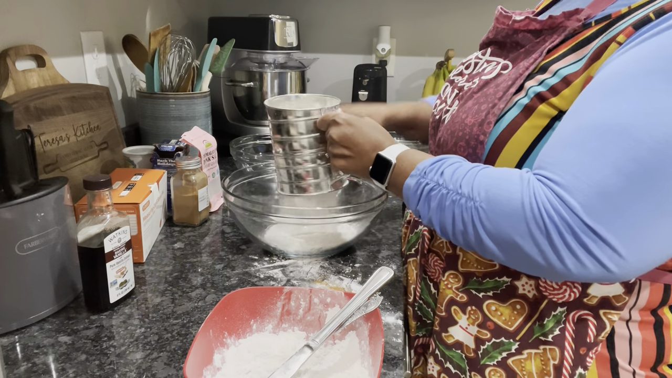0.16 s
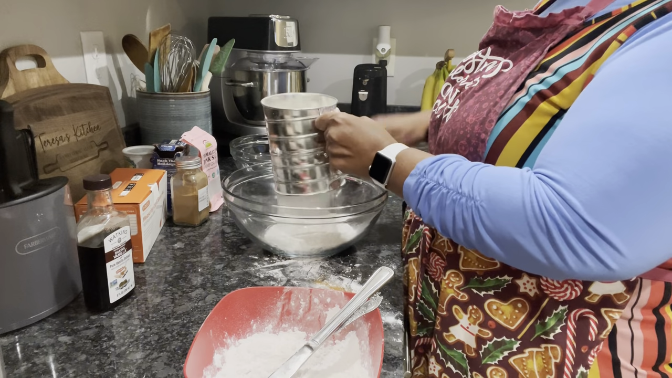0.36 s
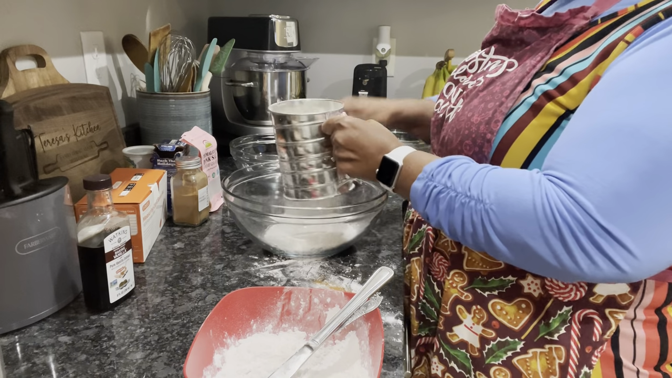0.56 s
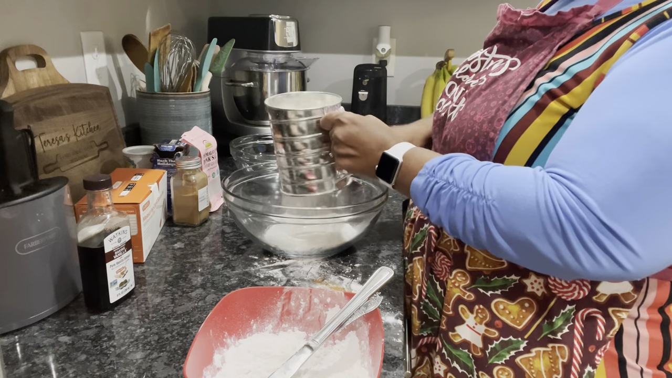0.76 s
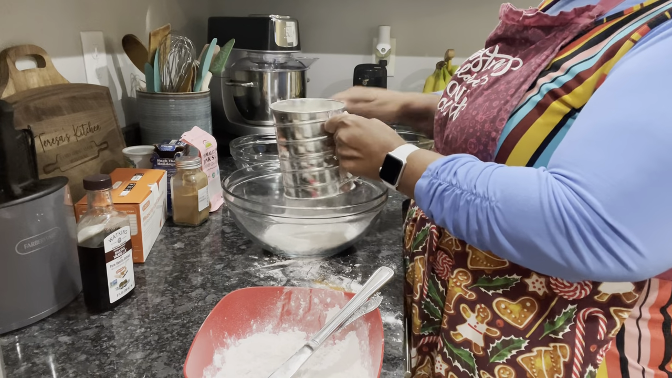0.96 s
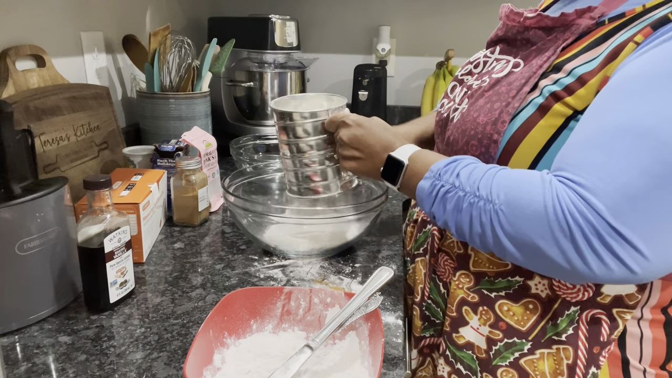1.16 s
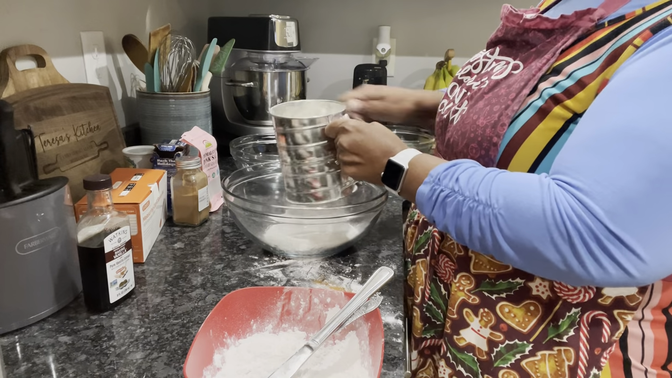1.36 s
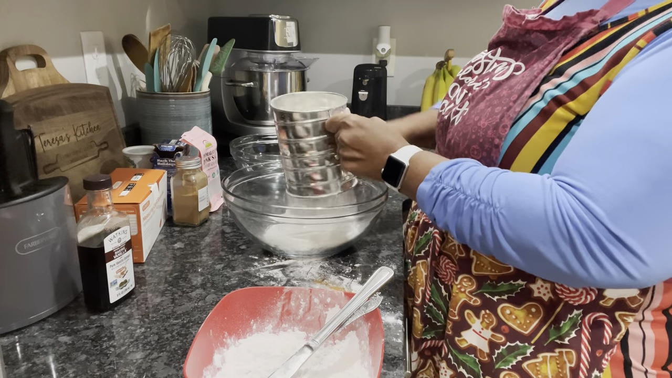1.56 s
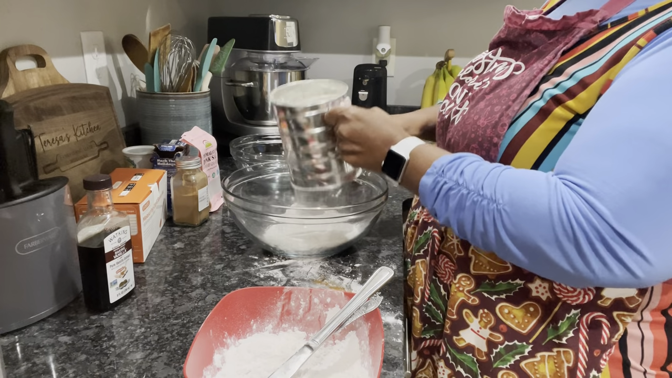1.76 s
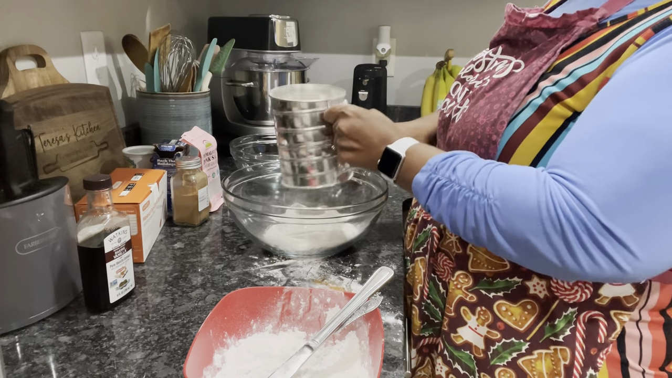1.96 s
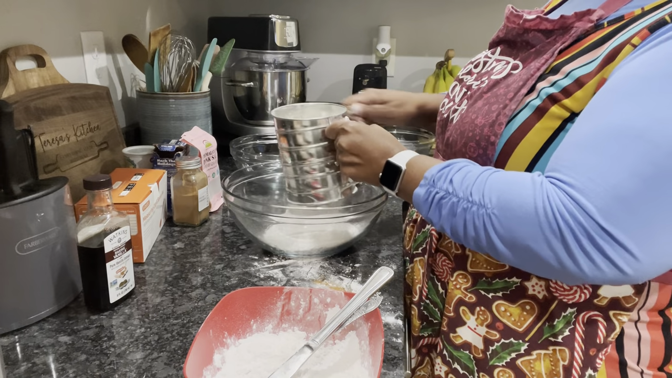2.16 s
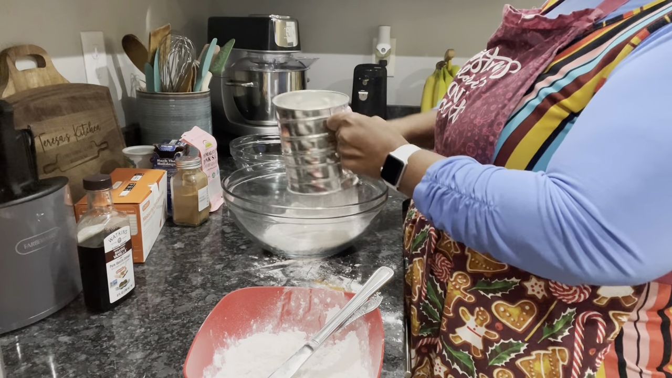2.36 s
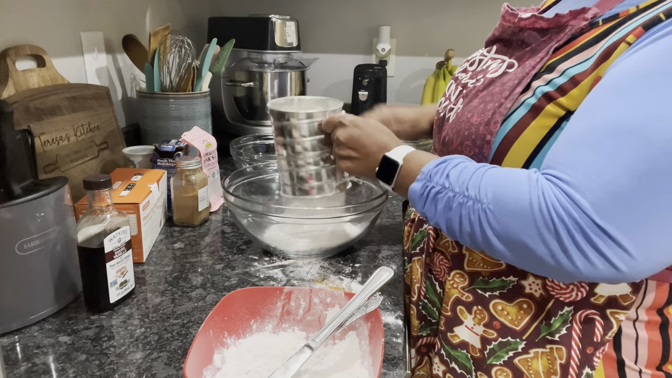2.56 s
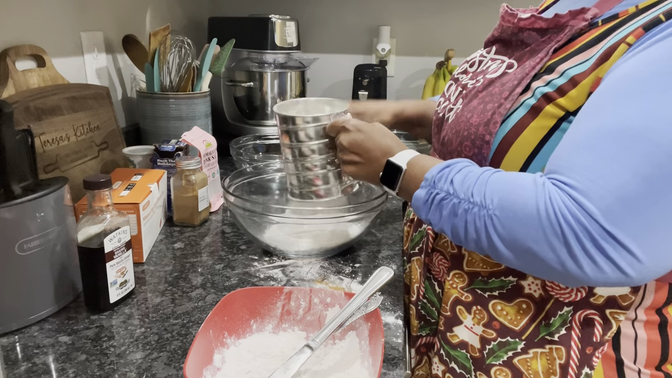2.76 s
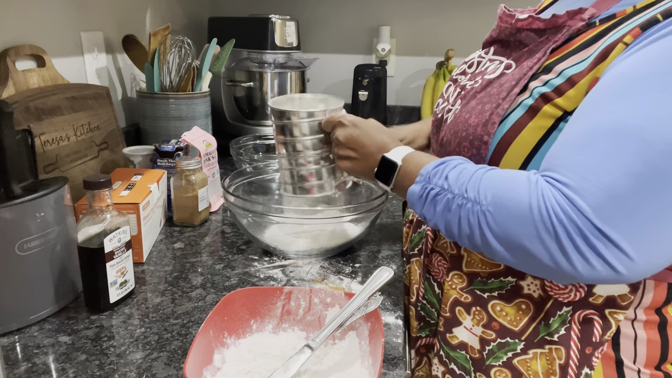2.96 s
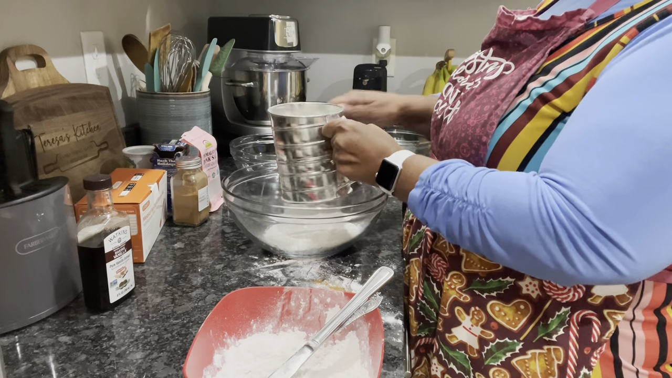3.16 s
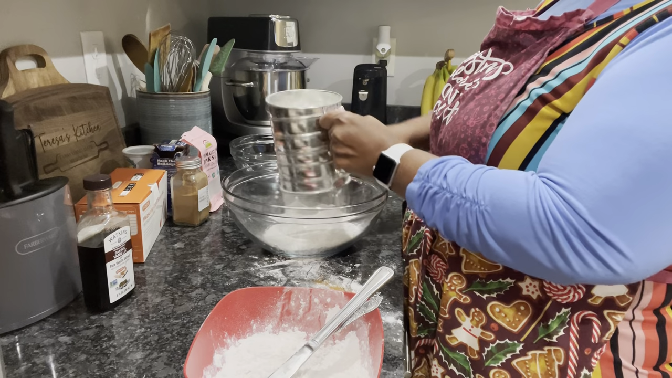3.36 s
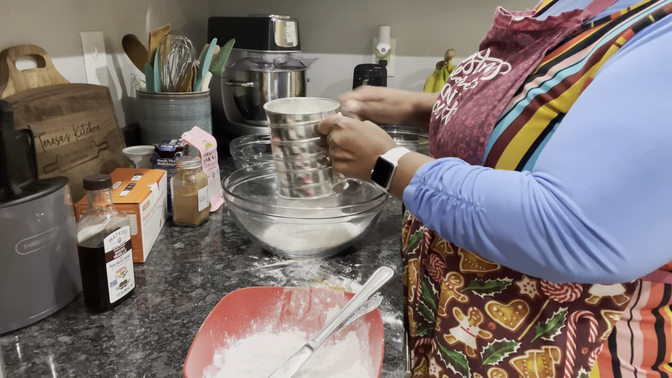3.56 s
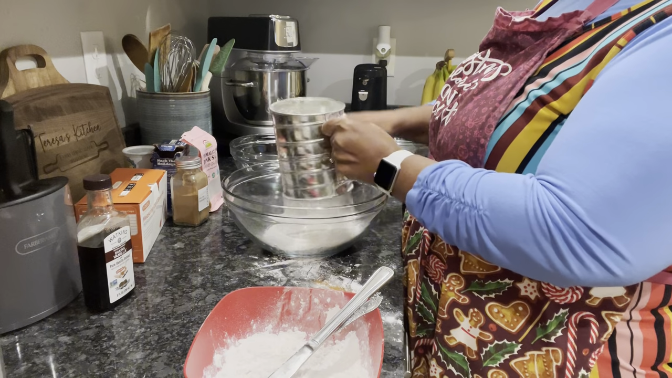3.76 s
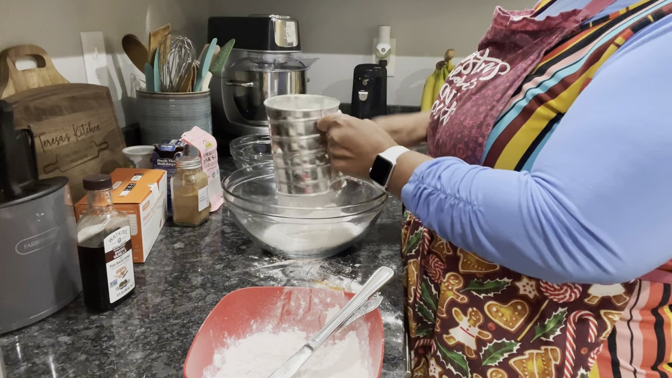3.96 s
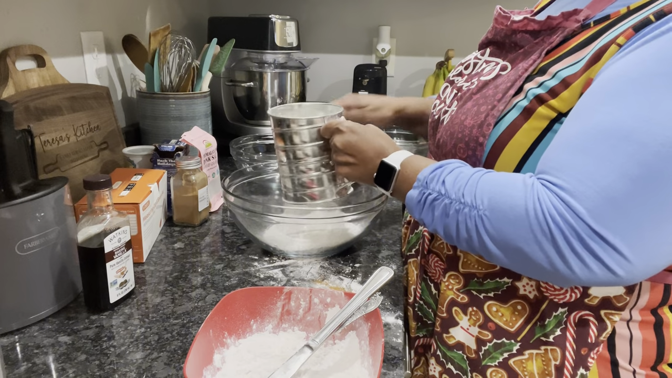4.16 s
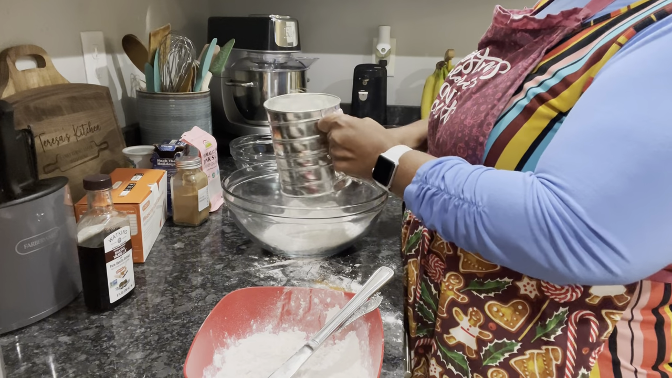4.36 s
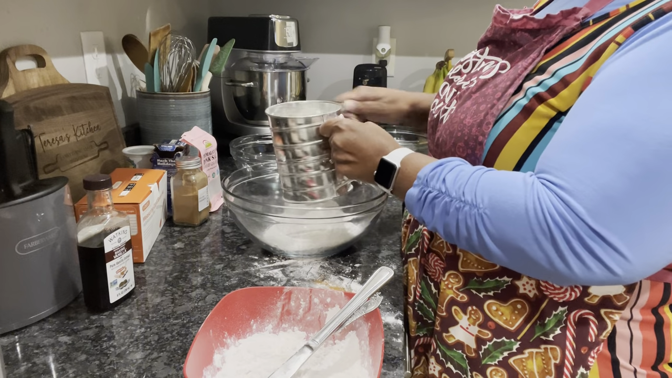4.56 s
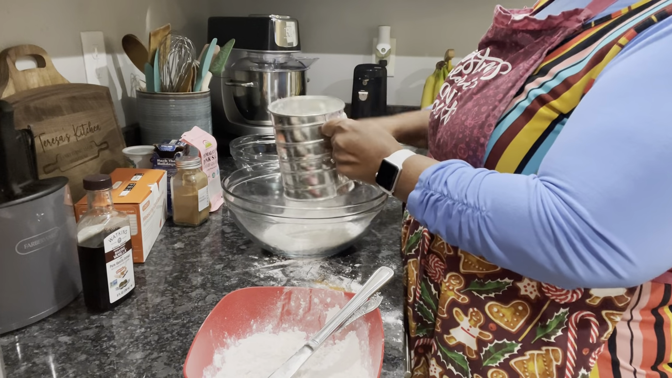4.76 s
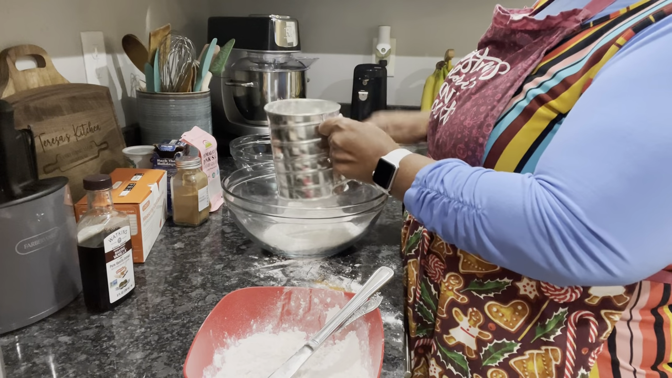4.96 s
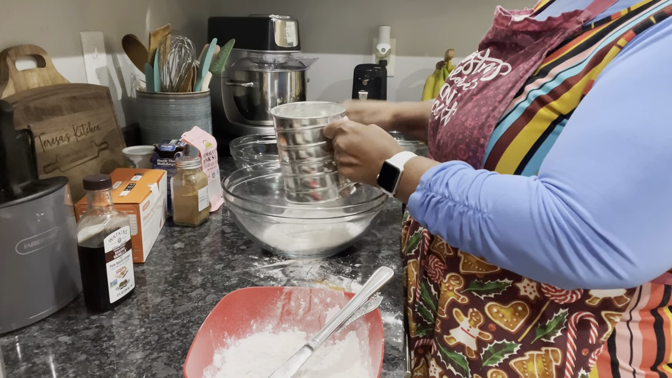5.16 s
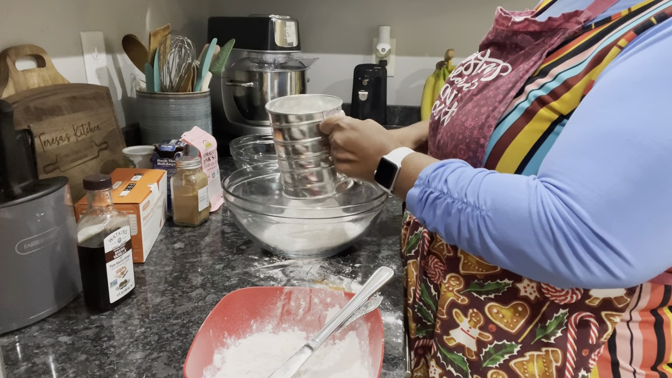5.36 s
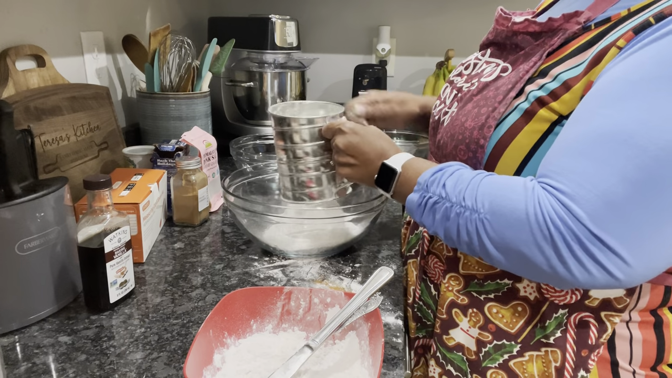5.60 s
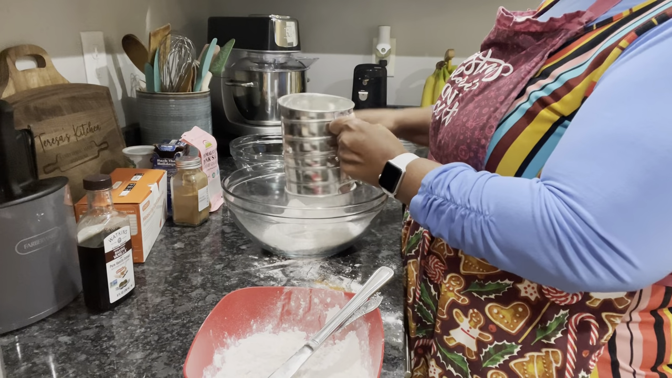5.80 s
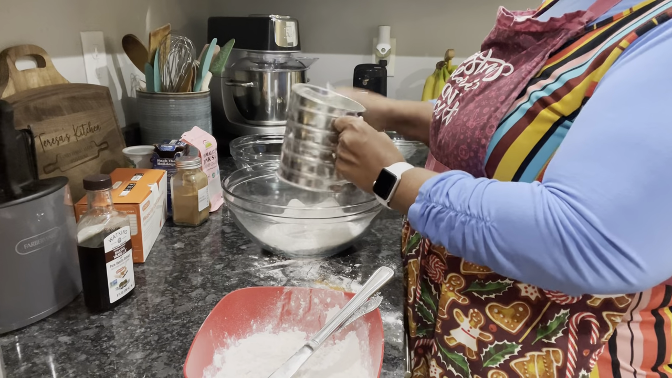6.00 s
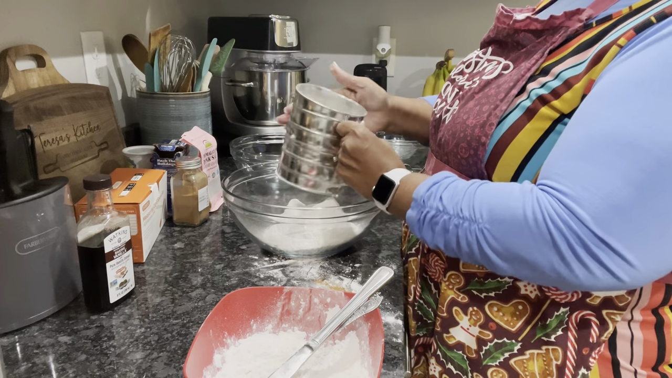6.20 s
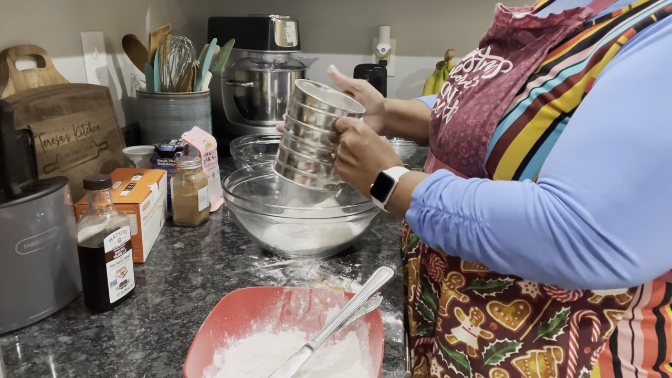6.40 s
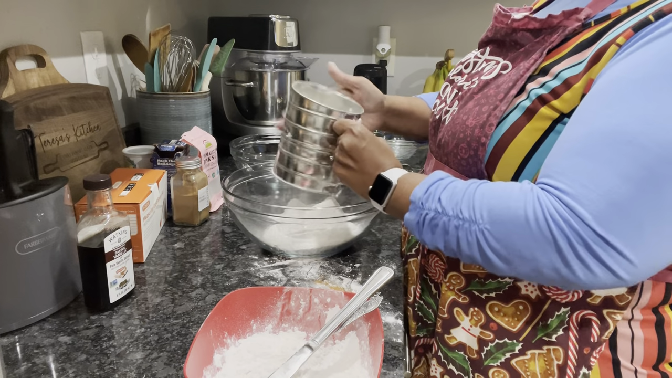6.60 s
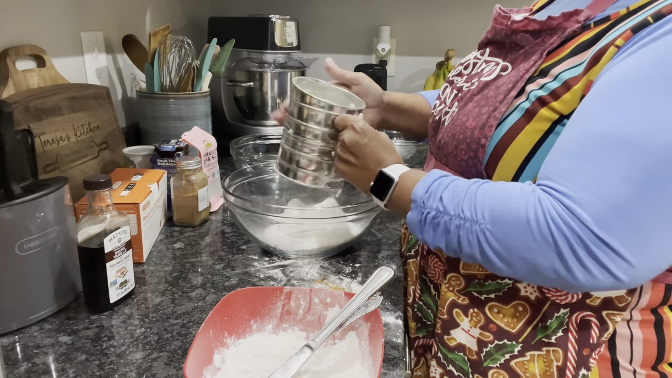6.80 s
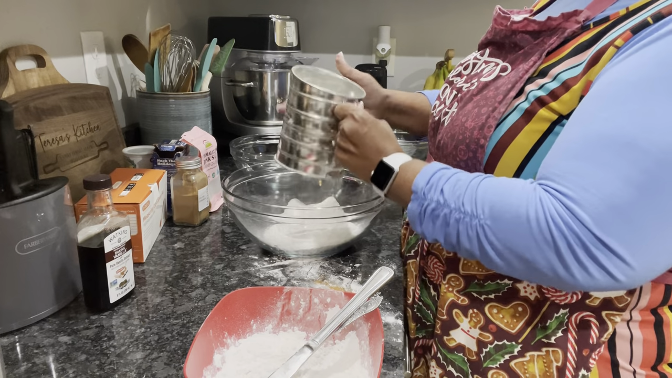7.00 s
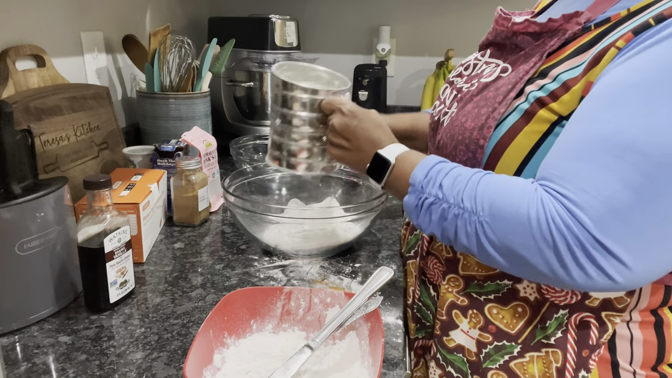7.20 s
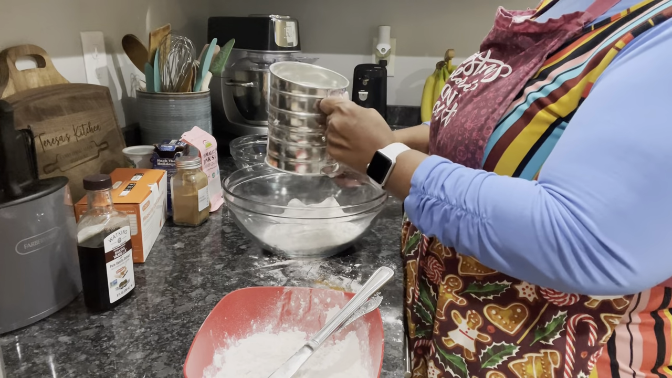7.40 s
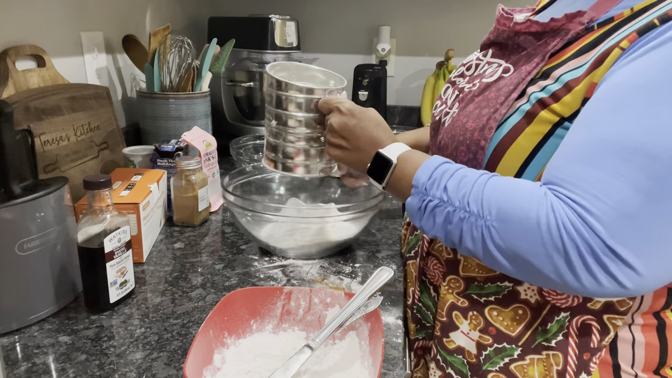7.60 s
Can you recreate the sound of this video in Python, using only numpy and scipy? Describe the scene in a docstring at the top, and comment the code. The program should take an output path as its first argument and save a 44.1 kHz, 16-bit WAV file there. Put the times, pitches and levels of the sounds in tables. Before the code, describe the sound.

A close stereo pair hears wire dragging over mesh in a flour sifter, fast and regular, with low groaning crunches of packed flour and irregular thin metallic ticks. After nearly six seconds of strokes, a palm hits the can in five evenly spaced thuds with tinny jangles. Two soft woody bumps end it, the second harder. The small kitchen adds brief echoes over a quiet bassy hush.

```python
"""A tin flour sifter is worked over a glass bowl in a small kitchen, about four strokes a second, close to a stereo pair.
Coloured grit noise makes the churning flour and the wire dragging over the mesh; flour stuck under the wire groans.
Loose metal clacks in noise bursts; resonances ring as the can, and short wandering delays stand for bowl and can wall.
Then the sifter is tipped and slapped five times with the palm; two dull knocks follow, built from damped modes.
The kitchen's echoes lie under the direct sound, over a faint, mostly low room hush."""
import sys
import numpy as np
from scipy import signal
from scipy.fft import rfft, irfft, next_fast_len
from scipy.io import wavfile

SR = 44100
rng = np.random.default_rng(int(sys.argv[2]) if len(sys.argv) > 2 else 0)


def int16_out(signal):
    """Quantize to a 16-bit WAV file."""
    q = np.round(np.clip(np.atleast_2d(signal).T, -1, 1) * 32767)
    wavfile.write(sys.argv[1], SR, q.astype(np.int16))


N = 336924
SIZE = next_fast_len(N + SR // 2, real=True)  # room for the echo tail
TIME, HZ = np.arange(N) / SR, np.fft.rfftfreq(SIZE, 1 / SR)

# Strokes of the wire. Each row: start in seconds, length in seconds, relative flour level in dB,
# relative level of wire on mesh in dB, pitch of the groan at mid-swell in Hz, its glide in octaves a second.
STROKES = [(0.008, .12, -35, -38, 400, -11), (0.243, 0.092, -38.5, -35.5, 380, -12),
           (0.441, 0.12, -34, -38, 344, 0), (0.686, 0.1, -37.5, -37, 378, -1),
           (0.884, .13, -38, -36, 427.2, 10), (1.126, 0.11, -38, -34.5, 399, 6),
           (1.340, 0.11, -35.5, -35.5, 472.5, 8), (1.553, 0.094, -40.5, -48.5, 370, -16),
           (1.953, 0.032, -36.5, -33, 400, -5.5), (2.129, .15, -36, -37.5, 540, 1),
           (2.38, .12, -37.5, -30.5, 200, -7), (2.604, .15, -36.5, -40, 331, 0),
           (2.861, 0.12, -42, -36, 338, -6.5), (3.072, 0.14, -36.5, -37, 334.4, -4.5),
           (3.342, 0.11, -41, -34.5, 329, -3.5), (3.54, 0.15, -37.5, -35.5, 322.5, 1),
           (3.821, .12, -42.5, -34, 338.7, -10), (4.037, 0.15, -38, -37, 332.5, -0.5),
           (4.297, .12, -41, -36, 307.2, -8), (4.527, 0.14, -38.5, -35.5, 309, 0.5),
           (4.793, .13, -40.5, -36, 308.2, 2), (5.024, 0.13, -37, -35.5, 330, 0),
           (5.293, .16, -40, -39, 301.2, 6.5), (5.577, 0.17, -40, -34.5, 333.4, -0.5)]
# Spectrum of the churned flour. Each row: frequency in Hz, relative level in dB per Hz.
FLOUR_SPECTRUM = [(40, -30.5), (90, -19.5), (150, -13), (210, 6.5), (270, -4), (335, 3), (410, -3.5),
                  (580, 2.5), (800, -2.5), (960, -8.5), (1200, -15), (2500, -20.5)]
# Spectrum of wire on mesh, before the can rings. Each row: frequency in Hz, relative level in dB per Hz.
MESH_SPECTRUM = [(200, -23), (800, 12.5), (1200, -3), (1600, 8), (2050, 8.5), (2500, 0.5), (3600, -0.5),
                 (4800, 3), (6500, 1), (7800, -11.5), (10000, 3.5), (12800, -3.5), (14500, -14),
                 (16000, -38)]
# Clacks of the mechanism. Each row: time in seconds, relative level in dB,
# weight of the can's body against the treble in dB.
CLACKS = [(0.059, -31, -10.5), (0.091, -31.5, -3.5), (0.275, -26, -11), (0.385, -43, 3.5),
          (0.458, -29, -12.5), (0.523, -33, -5.5), (0.718, -20, -12.5), (0.770, -27.5, -22),
          (0.832, -33, -8), (0.964, -22.5, -6), (1.124, -37, -13), (1.166, -24, -14), (1.241, -25.5, -7),
          (1.39, -30, -8), (1.418, -31, -11), (1.562, -20, -16.5), (1.944, -29.5, -8), (1.97, -28, -16.5),
          (2.417, -25.5, -8), (2.429, -22, -18), (2.459, -20.5, -12), (2.479, -19, -10),
          (2.613, -29.5, -8.5), (2.704, -21, -9.5), (2.955, -21, -13.5), (3.063, -43, 0.5),
          (3.168, -28.5, -6), (3.353, -29, -15.5), (3.44, -27, -5.5), (3.627, -26, -8.5),
          (3.671, -18, -9.5), (3.771, -33, -15), (3.83, -26, -14), (3.873, -23.5, -14.5), (3.996, -33, -9),
          (4.143, -24, -10.5), (4.309, -13.5, -17.5), (4.52, -27.5, -16.5), (4.622, -29.5, -7.5),
          (4.8, -25, -17), (4.828, -28, -6.5), (4.851, -26, -15), (4.894, -26.5, -8), (5.023, -26, -17),
          (5.11, -26, -13), (5.298, -24.5, -20), (5.386, -20, -11.5), (5.425, -19.5, -11),
          (5.439, -28.5, -16), (5.545, -34.5, -9), (5.694, -25.5, -11.5), (5.867, -35, -18),
          (5.924, -33, -8), (6.184, -27.5, -14), (6.196, -22.5, -10), (6.224, -25.5, -15.5),
          (6.373, -22, -10), (6.385, -20, -16.5), (6.421, -21.5, -15.5), (6.507, -34.5, -4.5),
          (6.558, -18, -10.5), (6.595, -26.5, -22), (6.736, -15, -11), (6.883, -31.5, -12.5),
          (6.920, -15.5, -9), (6.936, -25.5, -14.5), (6.985, -27, -15), (7.194, -27.5, -9)]
# Spectrum of a clack's treble. Each row: frequency in Hz, relative level in dB per Hz.
CLACK_TOP_SPECTRUM = [(1200, -18.5), (2700, -0.5), (3600, 1.5), (4700, 6), (6500, 3.5), (7800, -8.5),
                      (10000, 3.5), (12700, -3), (14500, -14.5), (16000, -27.5)]
# Spectrum of a clack's body. Each row: frequency in Hz, relative level in dB per Hz.
CLACK_BODY_SPECTRUM = [(60, -16.5), (200, -5), (600, 0.5), (1150, -4), (1600, 4.5), (2100, 8), (2700, -4),
                       (4000, -37)]
# Bright edge of a hard clack. Each row: frequency in Hz, relative level in dB per Hz.
SIZZLE_SPECTRUM = [(3000, -40), (7000, -8), (10000, 2.5), (12500, 3.5), (14500, -2.5), (16000, -18.5)]
# Modes of the can. Each row: frequency in Hz, width in Hz, gain in dB when upright, gain in dB when tipped,
# both gains before the grip shifts them.
CAN_MODES = [(1447, 48, 2.5, -5), (1640, 123, 4.5, -18), (1885, 60, 4, 1), (2180, 16, -12, 6),
             (2854, 31, 10, -6), (2983, 90, 7.5, 0), (3255, 21, -10, 11.5), (3830, 91, -7.5, 4),
             (4295, 40, 5, 9.5), (4760, 32, 5.5, 3), (4920, 31, -6.5, 8.5), (6500, 650, 3, 4),
             (8060, 35, -20.5, 9.5), (10290, 5.3, -17.5, 7.5), (12100, 240, -6.5, -7),
             (12900, 150, 2.5, -5)]
# The hand slaps or jolts the can. Each row: time in seconds, relative level in dB, factor on the thud's pitch,
# relative level of the wire shaken against the mesh in dB.
SLAPS = [(1.945, -34, 1.1, -48), (6.185, -27, 0.95, -31.5), (6.375, -26.5, 0.98, -39.5),
         (6.557, -23, 1.11, -27), (6.740, -26, 0.96, -30.5), (6.922, -23.5, 0.83, -37)]
# Modes that a slap pushes. Each row: frequency in Hz before the pitch factor, relative level in dB,
# t60 in seconds, delay in seconds.
THUD_MODES = [(565, 5.5, 0.011, 0.00042), (376, 5.5, 0.013, 0.0012), (254, -1, 0.034, 0.0033),
              (111, -4.5, 0.049, 0.0066)]
# Dull knocks nearby. Each row: time in seconds, relative level in dB,
# frequency in Hz above which the soft contact passes little.
KNOCKS = [(7.350, -27, 950), (7.360, -27, 900), (7.509, -24.5, 1190), (7.520, -22.5, 1500),
          (7.534, -29.5, 1800), (7.552, -43, 1500)]
# Modes that the knocks ring with. Each row: frequency in Hz before a small random shift, relative level in dB,
# t60 in seconds, delay in seconds.
WOOD_MODES = [(74, -22, 0.36, 0.012), (121, -14, 0.214, 0.0084), (200, -7, 0.034, 0.0048),
              (465, -8.5, 0.1, 0.00079), (560, -3.5, 0.021, 0.00023), (639, -2, 0.053, 0.00034),
              (715, -5.5, 0.04, 0.00028), (832, -9.5, 0.043, 0.0006), (1070, -16, 0.2, 0.00077),
              (1247, -28, 0.037, 0.00042), (1830, -26, 0.073, .0004), (2420, -23, .06, 0.00039)]
# Decay of the kitchen. Each row: frequency in Hz, t60 in seconds.
KITCHEN_DECAY = [(100, 0.47), (500, 0.31), (1500, 0.35), (4500, 0.46), (10000, 0.21), (15000, 0.14)]
# Spectrum of the room hush. Each row: frequency in Hz, relative level in dB per Hz.
HUSH_SPECTRUM = [(30, -8.5), (50, -8), (66, 5), (98, -7.5), (120, 3), (170, -5), (250, -8), (550, -13),
                 (1000, -20.5), (3000, -34.5), (13000, -39.5), (16000, -62.5)]
# Width of the microphone pair. Each row: frequency in Hz, gain of the side signal in dB.
WIDTH = [(60, -11.5), (200, -12), (400, -6), (800, -3), (1150, -0.5), (1900, -5), (3500, -2), (6500, -7.5),
         (8500, 1.5), (10400, -7), (12000, -26.5), (14000, -19.5)]
# Balance of the microphone pair. Each row: frequency in Hz, left minus right in dB.
LEAN = [(60, 2), (120, 5), (240, 5), (480, 3), (950, -0.5), (1890, 1.5), (3770, 1.5), (7520, 0.5),
        (15000, -0.5)]
# Phase between the microphones. Each row: frequency in Hz, lag of the left behind the right in radians.
LAG = [(0, 0), (700, 0.5), (1050, -.3), (1900, -.2), (2400, .7), (4000, 1.2), (5300, 2.3), (7700, 2.3),
       (9600, 1.0), (10800, .15), (13000, 0)]

CRUNCH_AT = 0.59  # where the flour resists most, as a share of the stroke


def flour(crunch_width=0.26):
    """Packed flour gives way in soft crunches that swell and fade with each stroke."""
    t = np.arange(-SR // 4, SR // 4) / SR
    push = np.zeros(N)
    for start, length, flour_db, _, _, _ in STROKES:
        swell = 1 / np.cosh(t / (crunch_width * length))
        add(push, start + CRUNCH_AT * length + t[0], amp(flour_db) * swell)
    crunches = grit(per_s=600, life_s=0.0022, spread_db=3.5) * push
    return colour(crunches, FLOUR_SPECTRUM) * amp(-3.5)


def groans(stroke_share=0.19, width_hz=45, share_db=-4.0):
    """Flour sticks and slips under the wire in mid-stroke: a short, hoarse, gliding note."""
    t = np.arange(-SR // 10, SR // 10) / SR
    smoothing = np.exp(-np.pi * width_hz / SR)
    out = np.zeros((2, N))
    for start, length, flour_db, _, hz, glide in STROKES:
        swell = np.exp(-0.5 * (t / (stroke_share * length)) ** 2)
        noise = rng.standard_normal((2, len(t), 2)) @ [1, 1j]
        waver = signal.lfilter([1], [1, -smoothing], noise)  # slow noise makes the note hoarse
        phase = 2 * np.pi * np.cumsum(hz * 2 ** (glide * t)) / SR
        note = (waver * np.exp(1j * phase)).real * swell
        for channel, voice in zip(out, note):
            voice = voice * np.linalg.norm(swell) / np.linalg.norm(voice)
            add(channel, start + CRUNCH_AT * length + t[0], amp(flour_db + share_db) * voice)
    return out


def scrape():
    """The wire ticks over the threads of the mesh and now and then snags on one."""
    threads = grit(per_s=1400, life_s=0.0015, spread_db=0.5) * amp(-9.0)
    snags = grit(per_s=80, life_s=0.0018, spread_db=2.5) * amp(-11.0)
    return colour((threads + snags) * drag(), MESH_SPECTRUM)


def drag():
    """How hard the wire rubs the mesh: driven by each stroke, shaken by slaps, nudged by clacks."""
    bite_s, bite_db = 0.0027, -11  # it bites softly,
    pressed_at, run_out_s = 0.89, 0.014  # presses harder up to a share of the stroke, holds, runs out
    return_db, return_s = -12.5, 0.091  # and slides back lightly
    shake_s, nudge_db, nudge_s = 0.065, -23.5, 0.041
    t = np.arange(SR // 2) / SR
    bite = 1 - np.exp(-t / bite_s)
    power = np.zeros(N)
    for start, length, _, wire_db, _, _ in STROKES:
        press = amp(bite_db * np.maximum(1 - t / (pressed_at * length), 0))
        after = np.maximum(t - length, 0)
        release = np.exp(-after / run_out_s) + amp(return_db) * np.exp(-after / return_s)
        add(power, start, (amp(wire_db) * bite * press * release) ** 2)
    for s, _, _, shake_db in SLAPS:
        add(power, s, (amp(shake_db) * bite * np.exp(-t / shake_s)) ** 2)
    for s, db, _ in CLACKS:
        add(power, s, (amp(db + nudge_db) * bite * np.exp(-t / nudge_s)) ** 2)
    return np.sqrt(power)


def grit(per_s, life_s, spread_db):
    """Overlapping tiny slips of uneven size, as two unrelated signals (mid, side) of power 1."""
    size = amp(spread_db * np.minimum(rng.exponential(1, N), 4)) ** 2
    slips = size * (rng.random(N) < per_s / SR)
    power = signal.lfilter([1], [1, -np.exp(-1 / (life_s * SR))], slips)
    return np.sqrt(power / power.mean()) * rng.standard_normal((2, N))


def clacks(rise_s=0.00089, settle_s=0.0071, rattle_db=-20, rattle_s=0.015, hardness=0.69):
    """Loose metal chatters for a moment, then settles with a faint rattle; a faint soft swell lies around each clack."""
    chatter_s, swell_db, swell_s = 0.0092, -20, 0.005
    t = np.arange(-SR // 40, SR // 5) / SR
    age = np.maximum(t, 0)
    chatter = np.exp(-np.maximum(t - chatter_s, 0) / settle_s)
    rattle = amp(rattle_db) * np.exp(-age / rattle_s)
    swell = amp(swell_db) * np.exp(-abs(t) / swell_s)  # rises before and fades after the clack
    shape = (chatter + rattle) * (1 - np.exp(-age / rise_s)) + swell
    top, body, sizzle = np.zeros((3, N))
    for s, db, body_db in CLACKS:
        sizzle_db = db + hardness * (db - body_db)  # hard, light contacts are the brightest
        add(top, s + t[0], amp(db) * shape)
        add(body, s + t[0], amp(db + body_db) * shape)
        add(sizzle, s + t[0], amp(sizzle_db) * shape)
    contacts = grit(per_s=2400, life_s=0.0012, spread_db=3.0)
    fine_contacts = grit(per_s=2300, life_s=0.0006, spread_db=-1.0)
    bright = colour(fine_contacts * sizzle, SIZZLE_SPECTRUM) * amp(-10.5)
    treble = colour(contacts * top, CLACK_TOP_SPECTRUM) * amp(-12.5)
    return bright + treble + colour(contacts * body, CLACK_BODY_SPECTRUM) * amp(-5.5)


def can(x, grip_db=3, shifts_per_s=7, tipped_s=6.1):
    """The tin rings; the shifting grip favours now one mode, now another, and tipping frees others."""
    out = x.copy()
    for hz, width, upright_db, tipped_db in CAN_MODES:
        grips = amp(grip_db * rng.uniform(-2, 1, 100))
        grip = np.interp(TIME * shifts_per_s, np.arange(100), grips)
        gain = np.where(TIME > tipped_s, amp(tipped_db), amp(upright_db))
        out += signal.lfilter(*signal.iirpeak(hz, hz / width, fs=SR), x * grip * gain)
    return out


def bowl(x, echo=0.35, wander=0.12):
    """Bowl and can wall return close echoes whose paths change with the hand: a shifting metallic colour."""
    out = x.copy()
    for delay_s in (0.0009, 0.0021, 0.0037):
        drift = np.interp(TIME, np.linspace(0, TIME[-1], num=32), rng.standard_normal(32))
        late = np.arange(N) - np.round(delay_s * (1 + wander * drift) * SR).astype(int)
        out += echo * x[:, np.clip(late, 0, N - 1)]
    return out / np.sqrt(1 + 3 * echo ** 2)


def slaps():
    """The hand thuds against the side of the can, pushing a few short low modes."""
    out = np.zeros(N)
    for s, db, pitch, _ in SLAPS:
        add(out, s, amp(db) * blow(THUD_MODES, pitch, rise_s=0.00094))
    return out * amp([[3], [-16]])  # mid, side


def knocks(scuff_db=-12, scuff_s=0.0088):
    """Something wooden bumps twice, bounces and scuffs; the second bump is harder."""
    t = np.arange(SR // 2) / SR
    band = signal.butter(3, [350, 1100], "bandpass", fs=SR)
    out = np.zeros(N)
    for s, db, soft_hz in KNOCKS:
        scuff = signal.lfilter(*band, rng.standard_normal(len(t)))
        scuff *= amp(scuff_db) * np.exp(-t / scuff_s) / scuff.std()
        ring = blow(WOOD_MODES, rng.uniform(0.94, 1.03), rise_s=0.0013)
        soft_contact = signal.butter(2, soft_hz, fs=SR)
        add(out, s, amp(db) * signal.lfilter(*soft_contact, ring + scuff))
    return out


def blow(modes, pitch, rise_s):
    """Damped modes of one soft blow, each after its own delay; the lowest start late."""
    t = np.arange(SR // 2) / SR
    out = np.zeros(len(t))
    for hz, db, t60, delay in modes:
        age = np.maximum(t - delay, 0)
        envelope = (1 - np.exp(-age / rise_s)) * np.exp(-np.log(1000) * age / t60)
        out += amp(db) * envelope * np.sin(2 * np.pi * hz * pitch * age)
    return out


def kitchen(x, sway_per_s=0.9):
    """Three echo patterns trade places, as the sifter sways over the bowl."""
    turn = 2 * np.pi * sway_per_s * TIME
    echoes = sum(through(x * np.cos(turn + k * np.pi / 3), reflections()) for k in range(3))
    return echoes * np.sqrt(2 / 3)  # keeps the power steady through the sway


def reflections(gap_s=0.006):
    """Dense echoes from counter, wall and cupboards, each band dying at its own speed."""
    taps = rng.standard_normal((2, SR // 2))
    hz, t, bands = signal.stft(taps, SR, nperseg=256)
    decay = np.exp(-np.log(1000) * t / read(KITCHEN_DECAY, hz)[:, None])
    tail = signal.istft(bands * decay, SR, nperseg=256)[1]
    tail *= np.arange(tail.shape[1]) > gap_s * SR  # silent until the first echo
    return rfft(tail / np.linalg.norm(tail[0]), SIZE)


def room_hush():
    """Steady coloured noise behind everything, strongest in the bass."""
    return amp(-60.5) * colour(rng.standard_normal((2, N)), HUSH_SPECTRUM)


def amp(db):
    """Decibels to gain."""
    return 10 ** (np.asarray(db) / 20)


def read(points, hz):
    """A table read on a log-frequency axis."""
    f, value = np.transpose(points)
    return np.interp(np.log(hz + 1), np.log(f + 1), value)


def add(mix, s, sound):
    """Adds a sound that starts at time s, trimmed to the length of the mix."""
    start = round(s * SR)
    sound = sound[max(-start, 0):]
    part = mix[max(start, 0):][:len(sound)]
    part += sound[:len(part)]


def through(x, response):
    """Applies a frequency response."""
    return irfft(rfft(x, SIZE) * response, SIZE)[..., :N]


def colour(x, spectrum):
    """A causal (minimum-phase) filter that keeps the power of white noise."""
    gain = amp(read(spectrum, HZ))
    cepstrum = irfft(np.log(gain / np.sqrt(np.mean(gain ** 2))), SIZE)
    cepstrum[1:SIZE // 2] *= 2  # folding the cepstrum gives minimum phase
    cepstrum[SIZE // 2 + 1:] = 0
    return through(x, np.exp(rfft(cepstrum)))


def scene():
    """All sources as mid and side, then spread to the two microphones."""
    rubbing = bowl(can(scrape())) + flour() + groans()
    metal = bowl(can(clacks()), echo=0.23)
    thuds, bumps = slaps(), knocks()
    sent_to_room = amp(-12) * rubbing + amp(-8) * metal + amp(-13.0) * thuds[0] + amp(-6.0) * bumps
    mid, side = rubbing + metal + thuds + kitchen(sent_to_room) + room_hush()
    mid = mid + bumps  # the direct knocks have no side signal
    side = through(side, amp(read(WIDTH, HZ)))
    lean = amp(read(LEAN, HZ) / 2) * np.exp(-0.5j * read(LAG, HZ))  # half to each microphone
    return np.array([through(mid + side, lean), through(mid - side, 1 / lean)])


def record(dry, bass_cut_hz=47, edge_hz=15700):
    """The microphones' bass cut and the recorder's band limit."""
    bass_cut = signal.butter(4, bass_cut_hz, "high", fs=SR, output="sos")
    band_limit = signal.firwin(511, edge_hz, window=("kaiser", 9), fs=SR)
    return signal.oaconvolve(signal.sosfilt(bass_cut, dry), band_limit[None], "same")


dry = scene()
out = record(dry)
int16_out(out)
```